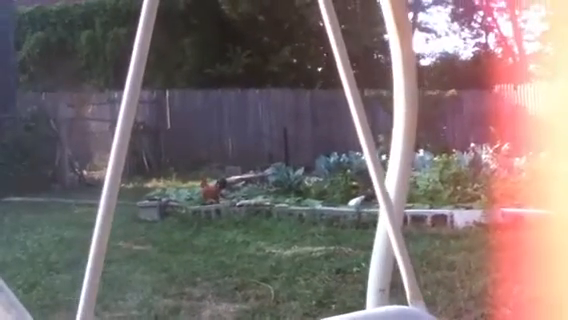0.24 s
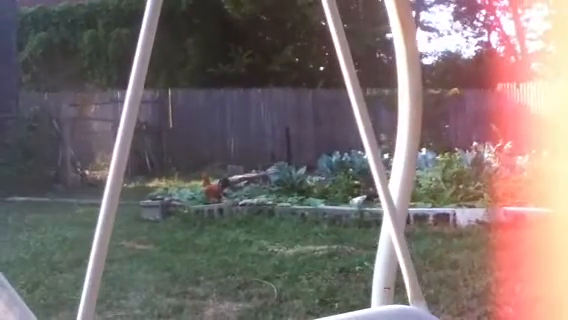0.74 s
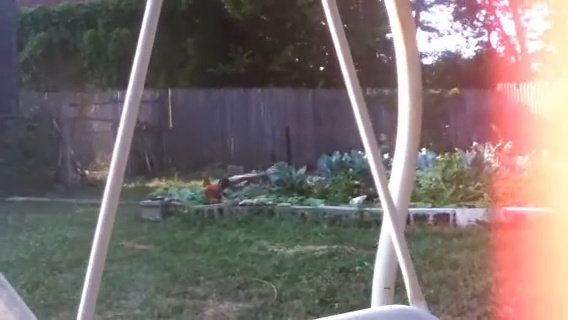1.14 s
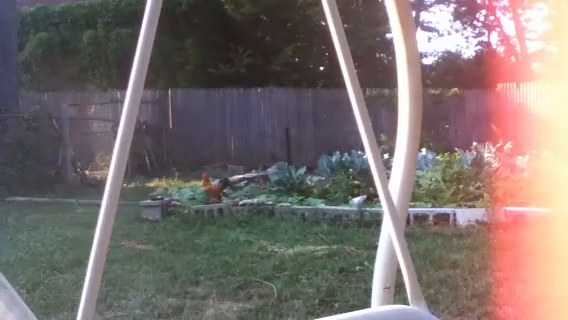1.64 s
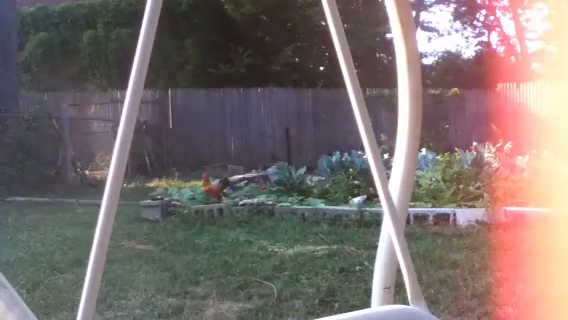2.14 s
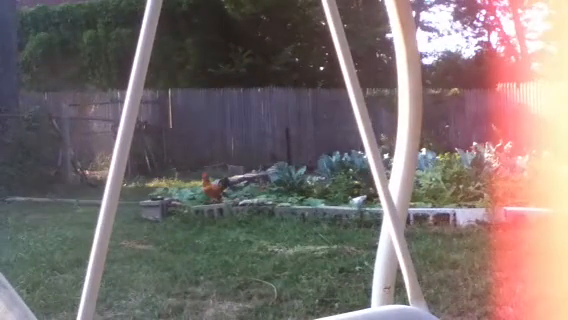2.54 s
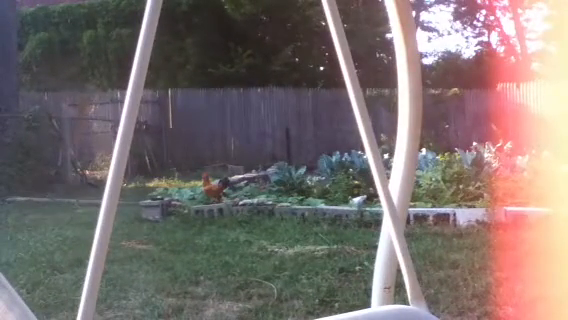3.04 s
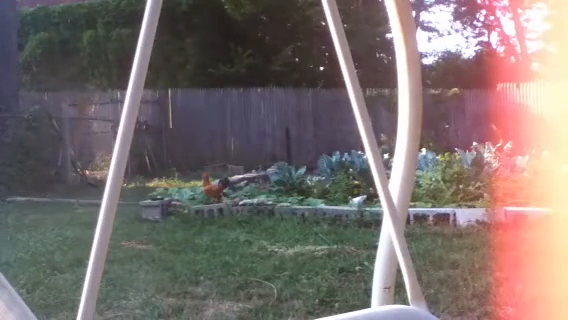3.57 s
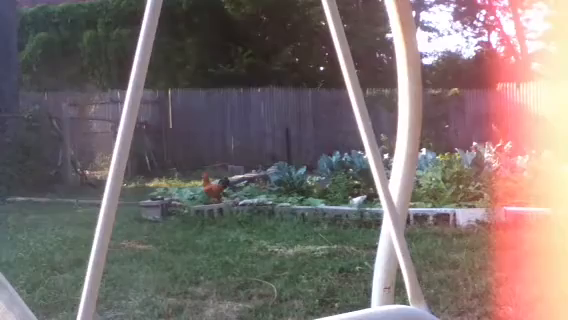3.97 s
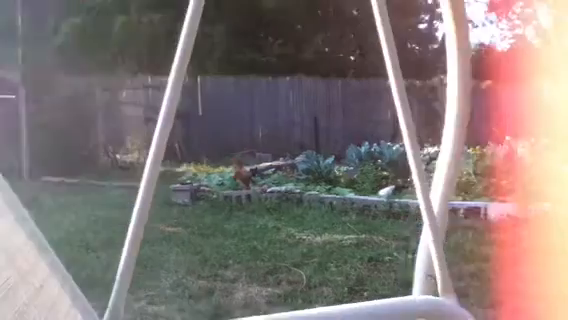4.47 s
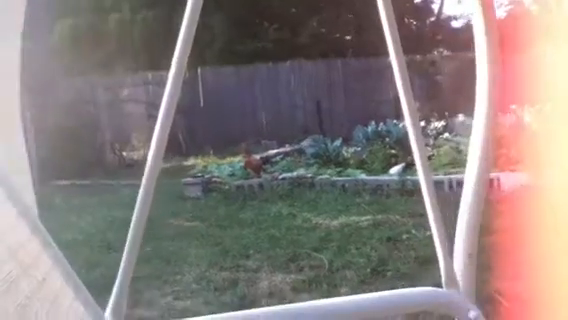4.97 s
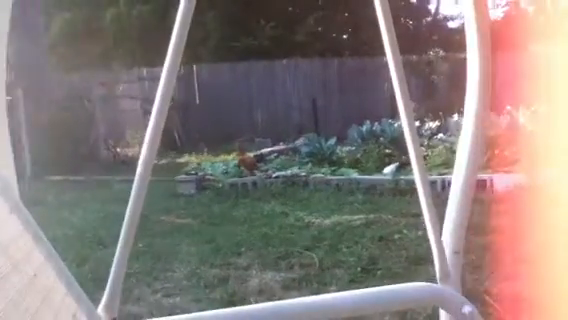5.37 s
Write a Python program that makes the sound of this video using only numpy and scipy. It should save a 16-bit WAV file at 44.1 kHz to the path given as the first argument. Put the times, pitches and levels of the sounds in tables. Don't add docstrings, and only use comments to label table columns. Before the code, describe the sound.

A quiet fenced garden at dusk, heard from some distance across the yard. Soft traffic hiss and low rumble run throughout, with a barely audible motor hum and a thin, high shimmer of far crickets. Single faint cricket trills appear irregularly from 0.3 seconds. At about 1.76 a rooster gives a short, rough, fluttering note lasting around 0.14 seconds. From 2.1 to 2.45 a second call rises, roughens in the middle, leaps to a brighter higher register and drops back hoarsely. At 2.64 the long call begins low, jumps up at 2.83 and holds a clear, nearly level cry, growing rougher after 3.2. Near 3.5 it drops in pitch, turns gravelly and sags, dying by 3.86. Short fence echoes and a brief dull tail follow. Then sparse cricket chirps remain, while the distant rumble swells gently from about 4.5 until the end at 5.6.

```python
import sys
import numpy as np
from scipy import signal
from scipy.fft import rfft, irfft, next_fast_len
from scipy.io import wavfile
from scipy.ndimage import uniform_filter1d

SR = 44100
rng = np.random.default_rng(int(sys.argv[2]) if len(sys.argv) > 2 else 0)


def inscribe(sig):
    pcm = np.round(np.clip(np.atleast_2d(sig).T, -1, 1) * 32767)
    wavfile.write(sys.argv[1], SR, pcm.astype(np.int16))


def how_loud(loudness_db):
    steps = np.asarray(loudness_db, float) / 20
    return 10 ** steps


N = 247401
T = np.arange(N) / SR
FAST = next_fast_len(N)
BIN_HZ = np.fft.rfftfreq(FAST, 1 / SR)

# time_s, pitch_hz
FIRST_CALL = [
    [(1.762, 680), (1.8, 719), (1.84, 749.7), (1.882, 728), (1.9, 732.4)],
]
SECOND_CALL = [
    [(2.1, 720.7), (2.114, 766), (2.142, 819)],
    [(2.154, 805.7), (2.24, 768.6), (2.272, 769.4)],
    [(2.276, 1035), (2.308, 1093), (2.35, 1111), (2.378, 1100), (2.394, 1040), (2.424, 990)],
    [(2.428, 743), (2.48, 729.5)],
]
LONG_CALL = [
    [(2.635, 685), (2.661, 675), (2.699, 757), (2.729, 764), (2.826, 745)],
    [(2.83, 912), (2.845, 879), (2.882, 871), (3.0, 868), (3.17, 861), (3.24, 868), (3.484, 872)],
    [(3.488, 684), (3.53, 693), (3.57, 690), (3.625, 667)],
    [(3.63, 660), (3.692, 650)],
    [(3.7, 597), (3.77, 572), (3.805, 556), (3.84, 520), (3.858, 510)],
]
# time_s, level_db
EFFORT = [
    [(1.755, -40), (1.765, -30), (1.793, -22.5), (1.857, -20.5), (1.925, -33.5)],
    [(2.085, -40), (2.109, -22), (2.159, -21.5), (2.275, -23.5), (2.281, -17), (2.337, -19.5),
     (2.359, -16.5), (2.433, -24), (2.49, -32)],
    [(2.625, -36.5), (2.655, -26), (2.729, -26.5), (2.805, -26), (2.837, -23), (2.861, -23.5), (3.357, -24),
     (3.823, -31), (3.88, -48)],
]
# start_s, first_harmonic_db, second_harmonic_db, third_harmonic_db, upper_harmonics_db (all relative to effort)
REGISTERS = [(1.76, -24, -9.5, -2, -5), (2.09, -19.5, -5, -8, -5), (2.152, -24.5, -4.5, -7, -8.5),
             (2.274, -3.5, -3, -13.5, -14), (2.392, -4, -7.5, -14, -15.5), (2.426, -23.5, -7, -5, -1),
             (2.6, -16, -4.5, -3.5, -5), (2.828, -1, -3.5, -21, -20.5), (2.9, -4, -2.5, -32.5, -16.5),
             (3.09, -1, -2.5, -23.5, -17.5), (3.172, 0, -25, -21.5, -21), (3.215, -2, -1.5, -21.5, -21),
             (3.332, -9, -8.5, -20, -33), (3.486, -17, -7, -1.5, -1), (3.627, -29, -16, -13, -15),
             (3.696, -20.5, -5, -5.5, -9.5), (3.77, -28, -4, -4, -1.5)]
# start_s, unsteadiness (0-1), flutter_depth, strong_weak_beat_depth
MEMBRANES = [(1.76, .45, 0, 0), (1.78, .08, 1, 0), (1.885, .6, 0, 0), (2.0, .06, 0, 0), (2.15, .13, 1, 0),
             (2.276, .045, 1.3, 0), (2.39, .14, 0, 0), (2.6, .4, 0, 0), (2.65, .04, 0, 0),
             (2.693, .04, 0, 1.1), (2.775, .045, 0, .4), (2.815, .04, 0, 0), (2.84, .011, 0, 0),
             (3.215, .04, 0, 0), (3.333, .42, 0, 0), (3.487, .03, 0, 0), (3.625, .12, 0, 2.2),
             (3.696, .2, 0, .8), (3.77, .1, 0, .3)]
# start_s, length_s, pitch_hz, level_db
CRACKS = [(1.759, 0.016, 913, -33), (1.887, 0.015, 963, -36.5), (2.088, 0.015, 1700, -43),
          (2.154, 0.0217, 975, -23.5), (2.191, 0.013, 960, -20.5), (2.218, .015, 972, -21.5),
          (2.247, 0.015, 956.6, -23.5), (2.644, .018, 988, -35.5), (3.262, 0.013, 949, -24.5)]
# start_s, length_s, level_db (relative to effort)
RASP_BOUTS = [(1.753, 0.029, 2), (1.887, 0.036, -3), (2.088, .02, -9), (2.144, 0.141, -5),
              (2.275, 0.035, -25), (2.387, 0.0609, -2.5), (2.449, 0.048, -6), (2.621, 0.053, -5),
              (2.672, 0.077, -30), (2.81, 0.03, -8.5), (3.088, 0.055, -14), (3.22, 0.1198, -12),
              (3.333, .157, -4), (3.49, .05, -20), (3.621, 0.078, -1.5), (3.693, 0.077, -2.5),
              (3.771, 0.059, -8), (3.83, 0.0463, 1.5)]
POSTURE_ENDS = [2.0, 2.55, 2.828, 3.486, 4.0]
# frequency_hz, level_db
THROATS = [
    [(1530, -29), (2600, -19), (3000, -6.5), (3840, -30), (3960, -50), (4430, -24.5), (5220, -9.5),
     (6830, -13.5), (9570, -35.5), (11100, -29), (15600, -58)],
    [(1650, -28), (2800, 7.5), (4340, -1.5), (4970, -18.5), (6580, -13.5), (8960, -16), (9490, -22),
     (11000, -31), (11400, -56), (12200, -21), (15600, -46)],
    [(1530, -29), (2600, -12), (2870, -1), (4770, -19.5), (5380, -9.5), (6060, -40), (6730, -13.5),
     (7590, -30), (9360, -20.5), (11500, -39), (15600, -41)],
    [(1940, -59), (3300, -19), (3520, 1.5), (3880, -12), (4360, -5.5), (4660, -39), (5270, -8.5),
     (6530, -34), (7010, -1), (7340, -16), (15600, -41)],
    [(1180, -24), (2000, 4), (2370, -8.5), (2800, -12), (3020, -6), (3440, -18), (4190, -24), (5140, -44),
     (8390, -22.5), (8910, -39.5), (15600, -62)],
]
# frequency_hz, level_db
RASP_COLOURS = [
    [(350, -52), (600, -14.5), (891, -12.5), (1290, -3), (2100, 5.5), (2580, -29), (3000, -6.5),
     (4210, -26), (7070, -15), (15600, -61)],
    [(350, -66), (600, -42), (954, 2), (1290, -18.5), (1540, -0.5), (1710, -4), (2280, -2), (2650, -12.5),
     (3080, -2), (3430, -21.5), (4100, -13.5), (6170, -33), (6690, -22), (10800, -39), (12800, -33),
     (15600, -62)],
    [(350, -56), (600, -21), (1500, 1.5), (3300, -13), (5240, -10.5), (6170, -37), (8670, -25),
     (15600, -50)],
    [(350, -70), (600, -50), (891, -3), (980, -10.5), (1270, -23), (1740, -10.5), (2340, -14.5),
     (3390, -22), (4760, -41.5), (7170, -33), (7570, -34), (15600, -73)],
    [(350, -46), (600, -18.5), (777, -33), (891, -3), (1190, -4), (1620, -19), (1780, -7), (3390, -16.5),
     (5030, -43), (6690, -26), (8550, -36.5), (15600, -65)],
]
# start_s, length_s, pitch_hz, level_db
CHIRPS = [(0.291, 0.12, 4700, -54.5), (0.873, 0.094, 4680, -56.5), (.92, .04, 6040, -59),
          (1.15, 0.071, 4900, -64), (1.208, 0.13, 4370, -65), (1.431, 0.13, 4650, -57.5),
          (1.74, .14, 4550, -61), (2.022, 0.15, 4660, -77), (0.372, .06, 4950, -66),
          (3.784, 0.094, 4800, -57), (4.474, .03, 4900, -64), (4.632, 0.091, 4880, -62.5),
          (4.855, .09, 4330, -67), (5.202, .03, 4980, -58), (5.3, .13, 4600, -61),
          (5.463, .03, 4870, -58.5), (5.502, .04, 4900, -62)]
# centre_hz, width_hz, level_db, throb_depth, throb_rate_hz
CHORUS = [(3480, 560, -72, 0.25, 6), (5580, 530, -69, 0.31, 96), (8360, 250, -76, 0.7, 18),
          (5950, 200, -90, 0.44, 6)]
# delay_s, level_db
FENCES = [(.021, -12), (.047, -13), (.085, -18.5), (0.136, -27), (.205, -27)]
# pitch_hz, level_db
MOTORS = [(1416, -72.5), (1472, -74)]
# frequency_hz, level_db
TOWN = [(15, -51), (25, -8.5), (82, -0.5), (140, -1), (446, -11), (743, -9.5), (1310, -11.5), (1420, -13),
        (1670, -14.5), (2240, -19), (5030, -18.5), (5600, -18.5), (7330, -21.5), (11300, -25),
        (15600, -32.5)]
# time_s, level_db
RUMBLE = [(0, -62), (1.5, -62), (3, -58.5), (4.2, -57), (4.7, -52), (5.61, -52)]


def rooster():
    (pitch_hz,) = curves(np.vstack(FIRST_CALL + SECOND_CALL + LONG_CALL))
    (effort_db,) = curves(np.vstack(EFFORT))
    unsteady, flutter, beat = steps(MEMBRANES)
    phase = voice_phase(pitch_hz, unsteady, flutter)
    upper, rasp = neck_postures(pitch_hz, phase, membrane_slaps(pitch_hz))
    tone = voice_tone(phase, upper, unsteady, beat)
    slipped, slips = register_slips()
    sounding = window(1.76, 0.14, 0.012) + window(2.092, 0.368, 0.0092) + window(2.64, 1.218, 0.018)
    driven = np.sqrt(2) * sounding * tone * (1 - 0.83 * slipped)
    rasping = sum(how_loud(db) * window(start, length, 0.0064) for start, length, db in RASP_BOUTS)
    rasp_flicker = how_loud(1.4 * band(0, 25) + 2.0 * band(32, 19))
    driven = driven + rasping * rasp_flicker * rasp
    voice = how_loud(effort_db) * driven + np.sqrt(2) * slips
    return signal.sosfilt(signal.butter(8, 540., "high", fs=SR, output="sos"), voice)


def voice_phase(pitch_hz, unsteady, flutter):
    flutter_hz, flutter_depth, flutter_start_s = 27.9, .014, 2.303
    wobble = flutter_depth * flutter * np.sin(2 * np.pi * flutter_hz * (T - flutter_start_s))
    shake = .001 * band(0, 30) + .16 * unsteady * band(200, 260)
    return 2 * np.pi * np.cumsum(pitch_hz * (1 + wobble + shake)) / SR


def voice_tone(phase, upper, unsteady, beat):
    *low_db, upper_db = steps(REGISTERS)
    tone = how_loud(upper_db - 5.0) * upper
    for k, db in enumerate(low_db):
        tone = tone + how_loud(db) * np.sin((k + 1) * phase + 1.36 * k)
    group = np.where((T > 3.6) & (T < 3.696), 3, 2)
    strong_weak = 1 + beat * 1.06 * np.cos(phase / group + 0.95)
    return tone * strong_weak * how_loud(3.2 * unsteady * band(0, 220))


def membrane_slaps(pitch_hz):
    slap_phase = np.cumsum(pitch_hz * np.maximum(1 + .45 * band(0, 500), .1)) / SR
    slaps = np.diff(np.floor(slap_phase), prepend=0) * how_loud(2.14 * rng.standard_normal(N))
    return slaps - slaps.mean() + 0.041 * rng.standard_normal(N)


def neck_postures(pitch_hz, phase, slaps):
    edges = [1.7] + POSTURE_ENDS
    upper, rasp = np.zeros(N), np.zeros(N)
    for start, end, throat, rasp_colour in zip(edges, edges[1:], THROATS, RASP_COLOURS):
        held = window(start - .003, end - start + .006, .006)
        part = held > 0
        upper[part] += held[part] * upper_harmonics(pitch_hz[part], phase[part], throat)
        rasp += held * colour(slaps, rasp_colour)
    return upper, rasp


def upper_harmonics(pitch_hz, phase, points):
    orders = np.arange(4, 24)[:, None]
    throat = how_loud(shape_db(points, orders * pitch_hz)) * (orders * pitch_hz < .36 * SR)
    knots = rng.standard_normal((len(orders), len(pitch_hz) // 900 + 2))
    place = np.arange(len(pitch_hz)) / 900
    waver_db = 3.5 * np.array([np.interp(place, np.arange(len(k)), k) for k in knots])
    throat = throat * how_loud(waver_db)
    total = np.sum(throat * np.sin(orders * phase + 0.403 * orders ** 2), axis=0)
    return total / np.sqrt(np.sum(throat ** 2, axis=0))


def register_slips():
    slipped, slips = 0, 0
    for start, length, slip_hz, db in CRACKS:
        gate = window(start, length, 0.003)
        pair = np.sin(2 * np.pi * slip_hz * T) + 0.51 * np.sin(4 * np.pi * slip_hz * T)
        slipped = slipped + gate
        slips = slips + gate * how_loud(db) * pair
    return slipped, slips


def crickets():
    out = 0
    for start, length, pitch_hz, db in CHIRPS:
        since = T - start
        stroke = .5 - .5 * np.cos(2 * np.pi * 78 * since)
        stroke = stroke * (1 + 0.63 * np.cos(2 * np.pi * 26 * (since - .006)))
        fade = how_loud(-6 * np.clip(since / length, 0, 1) + 1.9 * band(0, 58)) * window(start, length, 0.0097)
        drift = 8.0 * np.clip(since, 0, .2) ** 0.72 * band(0, 150)
        out = out + 2 * how_loud(db) * stroke * fade * np.sin(2 * np.pi * pitch_hz * T + drift)
    for centre_hz, width_hz, db, depth, rate_hz in CHORUS:
        throb = 1 + depth * np.sin(2 * np.pi * rate_hz * T + 0.96 * band(0, 2))
        strength = how_loud(db + 2.0 * band(0, 1.4) + 1.3 * band(0, 24))
        out = out + strength * throb * band(centre_hz, width_hz)
    return out


def yard(x):
    t60_s, tail_db, top_hz = 0.36, -9, 5760
    t = T[:SR]
    tail = rng.standard_normal(SR) * how_loud(-60 * t / t60_s) * np.clip(t / 0.018, 0, 1)
    response = tail * how_loud(tail_db) / np.sqrt(np.sum(tail ** 2))
    for delay, db in FENCES:
        response = response + how_loud(db) * np.sinc((t - delay) * SR)
    echo = signal.fftconvolve(x, response)[:N]
    return signal.sosfilt(signal.butter(1, top_hz, fs=SR, output="sos"), echo)


def town():
    (rumble_db,) = curves(RUMBLE)
    hiss = level(colour(rng.standard_normal(N), TOWN), -52.5) * how_loud(.5 * band(0, 2.3))
    rumble = how_loud(rumble_db - 3.5 + 2.4 * band(0, 16)) * band(132, 87)
    motors = 0
    for pitch_hz, db in MOTORS:
        motors = motors + how_loud(db + 3 + 2.0 * band(0, 1.4)) * np.sin(2 * np.pi * pitch_hz * T)
    return hiss + rumble + motors


def level(x, db):
    return x * how_loud(db) / np.sqrt(np.mean(x ** 2))


def shape_db(points, hz):
    p = np.array(points)
    return np.interp(np.log(np.maximum(hz, 1)), np.log(p[:, 0]), p[:, 1])


def colour(x, points):
    spectrum = rfft(x, FAST) * how_loud(shape_db(points, BIN_HZ))
    return level(irfft(spectrum, FAST)[:N], 0)


def band(centre_hz, width_hz):
    bell = np.exp(-2 * ((BIN_HZ - centre_hz) / width_hz) ** 2)
    return level(irfft(rfft(rng.standard_normal(FAST)) * bell, FAST)[:N], 0)


def window(start, length, edge):
    return np.clip(np.minimum(T - start, start + length - T) / edge, 0, 1)


def curves(rows):
    s, *columns = np.transpose(rows)
    return [np.interp(T, s, c) for c in columns]


def steps(rows):
    shift_s = 0.007
    s, *columns = np.transpose(rows)
    row = np.maximum(np.searchsorted(s, T) - 1, 0)
    return [uniform_filter1d(c[row], size=max(int(shift_s * SR), 1)) for c in columns]


def scene():
    bird = rooster() * how_loud(-1.0)
    near = bird + crickets()
    return (near + yard(near) + town())[None]


def top_cut(x):
    return signal.sosfilt(signal.butter(12, 15730, fs=SR, output="sos"), x)


def record(dry):
    sound = signal.sosfilt(signal.butter(3, 46., "high", fs=SR, output="sos"), dry)
    return top_cut(sound)


dry = scene()
out = record(dry)
inscribe(out)
```